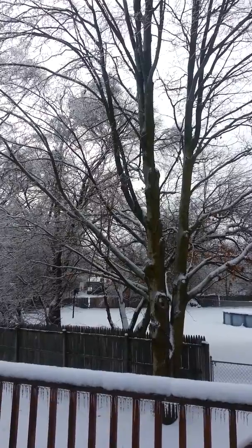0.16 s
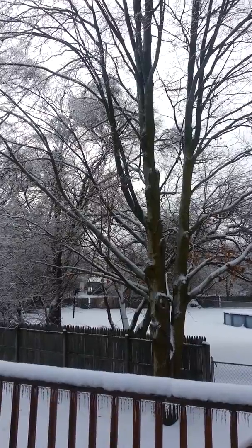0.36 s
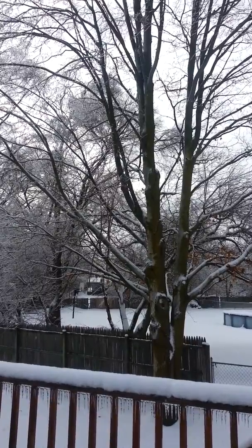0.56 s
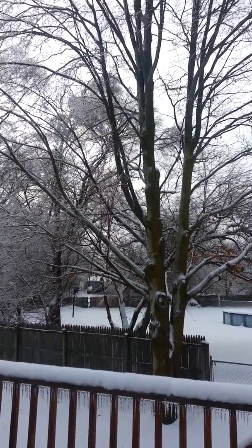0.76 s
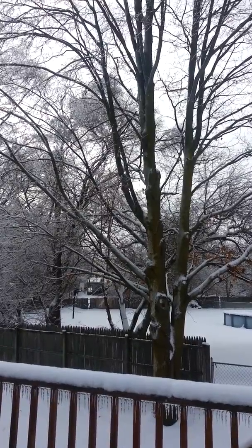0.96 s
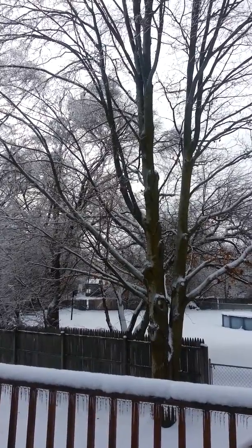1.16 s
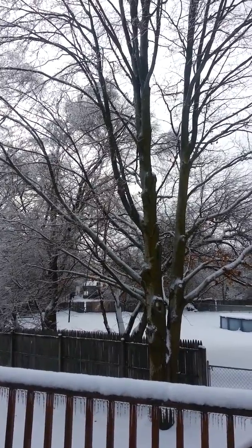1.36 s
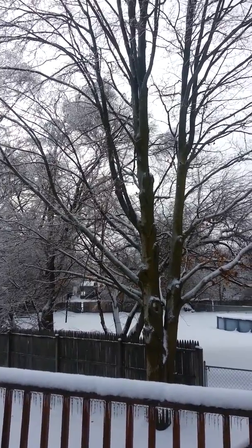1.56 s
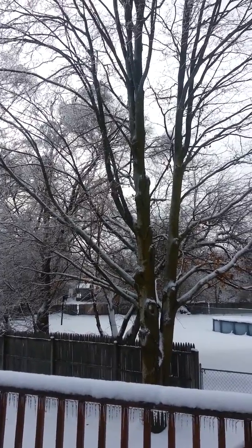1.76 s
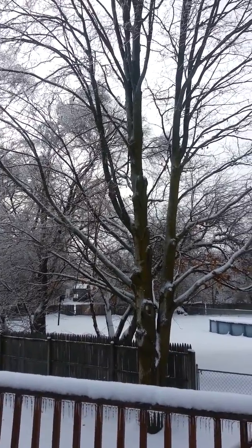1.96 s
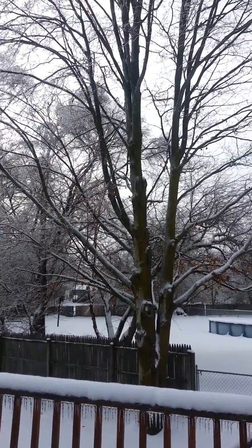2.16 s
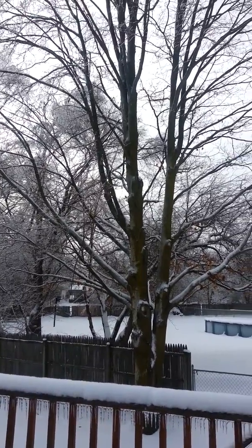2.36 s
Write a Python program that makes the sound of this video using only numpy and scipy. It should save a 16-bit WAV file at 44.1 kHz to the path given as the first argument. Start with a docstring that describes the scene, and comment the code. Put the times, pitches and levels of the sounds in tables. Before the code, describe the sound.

Thawing ice and drops fall from trees in a snowy yard, nearly mono. From 0 to 0.7 s, isolated crisp ticks, tiny pings and fragment sprays sit over thin patter, low hum and distant rush. Ticks then crowd together, with a sharp cluster at 1.2 s. A piece knocks wood at 1.4 s; thicker, uneven crackling continues to 2.5 s, with slushy plops and faint wind puffs near 2.2 and 2.4 s.

```python
"""Ice thaws in the trees of a snowy yard, heard nearly in mono over an electrical hum and a distant rush.
At first single pieces tick on twigs, drops ping, fragments scatter and a thin patter of drops lies behind.
The ticks crowd together from about 0.7 s; near 1.4 s a larger piece knocks on wood and the hum briefly swells.
From there the patter is thicker, with some dips, and two soft puffs of wind rumble near 2.2 and 2.4 s.
Impacts are shaped noise, pulses and random grains; pings, knock, hum and wind are built from sine waves."""
import sys
import numpy as np
from scipy import signal
from scipy.fft import rfft, irfft
from scipy.io import wavfile
from scipy.ndimage import uniform_filter1d

SR = 44100
rng = np.random.default_rng(int(sys.argv[2]) if len(sys.argv) > 2 else 0)


def dump(signal):
    """Clip the signal to [-1, 1] and save it as 16-bit WAV at the path in sys.argv[1]."""
    limited = np.clip(np.atleast_2d(signal).T, -1, 1)
    pcm = np.round(limited * 32767).astype(np.int16)
    wavfile.write(sys.argv[1], SR, pcm)


N = 110250  # length in samples, 2.5 s

# The hum's lowest tone. Each row: time in seconds, rms level in dB.
HUM_SWELL = [(.05, -40.5), (1.41, -40.5), (1.47, -37.5), (1.75, -40.3), (2.45, -40)]
# The hum's weaker upper tones. Each row: pitch in Hz, rms level in dB.
HUM_OVERTONES = [(240, -65), (340, -55), (360, -54), (388, -61), (480, -60), (600, -57)]
HUM_HZ = 120
HUM_WAVER_DB, OVERTONE_WAVER_DB, OVERTONE_SMEAR_RAD = -0.15, 2.5, 0.36

# Colour of the distant rush. Each row: frequency in Hz, relative level in dB.
RUSH_COLOUR = [(25, -14), (55, -12.5), (100, -2), (150, 0.5), (210, 5.5), (290, 5.5), (365, 6), (440, 1.5),
               (650, 1.5), (1000, -2.5), (2000, -11.5), (5000, -20.5), (14000, -85)]
RUSH_DB = -44

# Puffs of wind on the microphone. Each row: middle in seconds, level in dB, half length in seconds.
WIND_PUFFS = [(2.228, -52, 0.028), (2.393, -58, .025)]
PUFF_HZ = 65.7

# How thick the far patter is. Each row: time in seconds, level change in dB.
THAW = [(0, -12), (.12, -6.5), (.32, -10.5), (.49, -10.5), (.66, -6.5), (.79, -7), (.86, -5.5), (1.02, -3),
        (1.08, -4.5), (1.17, -5.5), (1.33, -5.5), (1.47, 5), (1.53, -1), (1.62, -0.5), (1.715, -6),
        (1.74, -0.5), (1.83, 0.5), (1.97, 1), (2.1, 3), (2.25, -1), (2.36, 0), (2.5, -1.5)]
# Colour of the far patter. Each row: frequency in Hz, relative level in dB per Hz.
PATTER_COLOUR = [(250, -35), (500, 2), (850, 4.5), (1500, 6.5), (2600, 4), (4700, 4.5), (7000, 1),
                 (10000, 0), (14500, 6.5)]
PATTER_DB, PATTER_PER_S, PATTER_SPREAD_DB, PATTER_ECHO_DB = -43, 200, 5.5, -3  # dB before the thaw curve
FLURRY_DB, FLURRY_PER_S = 3, 55  # drops of each size come in short flurries
WASH_DB, FLUTTER_DB = -43.5, 2.5  # drops too far off to tell apart, before the thaw curve

# Sprays of fragments further off. Each row: start in seconds, level in dB, decay in seconds,
# lower edge in Hz, upper edge in Hz.
SPRAYS = [(0.057, -35.5, 0.027, 2930, 12200), (.1, -39.5, 0.028, 3800, 6140),
          (.145, -26, 0.0084, 1950, 5640), (.208, -32.5, 0.024, 2000, 11500),
          (0.387, -39.5, .033, 4000, 13400), (0.581, -31.5, 0.01, 2960, 12800),
          (0.681, -31.5, 0.017, 1710, 9000), (0.82, -38, 0.015, 1500, 7060),
          (.93, -40.5, 0.033, 5000, 14000), (1.243, -31, 0.023, 3000, 14100),
          (1.419, -30.5, 0.05, 1180, 11900), (1.651, -32, 0.011, 3200, 4770),
          (1.725, -38, 0.019, 1920, 11900), (1.775, -36, .041, 3000, 14300),
          (2.035, -28, 0.028, 1200, 12800), (2.37, -35, 0.08, 2000, 13100)]
SPRAY_RISE_S, SPRAY_PER_S, SPRAY_SPREAD_DB = 0.013, 3200, 5.5

# Dull plops of slush. Each row: start in seconds, level in dB, lower edge in Hz, upper edge in Hz.
PLOPS = [(.226, 0, 280, 705), (.822, 4.5, 238, 755), (0.851, -1, 696, 2820), (.869, -9, 696, 3000),
         (.965, -2, 400, 1000), (1.245, 4.5, 170, 750), (1.422, 7, 280, 606), (1.559, -1, 900, 2400),
         (1.968, 0, 350, 1990), (2.305, -4, 1100, 2400), (2.429, 1.5, 402, 1900), (2.47, 0.5, 700, 2380)]
PLOP_S = 0.023  # decay

# Tiny drops that ring. Each row: start in seconds, pitch in Hz, peak of the direct ring in dB,
# level of the lingering ring against it in dB.
PINGS = [(0.0383, 8300, -42, -18), (.045, 8300, -33, -16), (.213, 9800, -41, -6), (0.388, 4830, -38.5, -3),
         (.723, 10500, -35, -15), (0.776, 7000, -33, -8), (.917, 12900, -43, -5), (.942, 11540, -37, -14),
         (1.080, 11900, -31.5, -21), (1.208, 5730, -36, -13), (1.265, 5400, -40, -9),
         (1.342, 14350, -32, -5), (1.6895, 14000, -32, -11), (1.716, 8900, -35.5, -8),
         (1.942, 10400, -37, -14), (1.9795, 11300, -35, -12), (2.001, 13950, -36, -9),
         (2.142, 1735, -37, -7), (2.385, 12000, -38, -7)]
PING_S, PING_TAIL_S = 0.0051, 0.025  # decay of the direct and of the lingering ring
# The many fainter pings; their level also follows the thaw curve.
TINK_PER_S, TINK_DB, TINK_SPREAD_DB, TINK_ECHO_DB = 90, -44, 2, -6
TINK_LO_HZ, TINK_HI_HZ = 2626, 13860

# Ringing modes of the knocked wood. Each row: pitch in Hz, level in dB, decay in seconds.
KNOCK_MODES = [(1470, 6.5, 0.0014), (1510, -1.5, 0.0016), (2110, -8, 0.0052)]
KNOCK_S, KNOCK_DB, KNOCK_RISE_S, KNOCK_ECHO_DB = 1.4168, -18.5, 0.0016, -5  # KNOCK_S is its start

# Near ticks of ice and drops. Each row: start in seconds, level in dB, lower edge in Hz,
# upper edge in Hz, level of the scatter after it against the tick in dB.
TICKS = [(0.0375, -7.5, 5000, 8800, -22), (.059, -21, 4000, 11000, -8), (.2125, -14, 6000, 10400, -10),
         (0.4333, -14.5, 4500, 11500, -5), (0.5234, -15.5, 2660, 12000, 5.5),
         (0.714, -15.5, 1990, 12900, 9.5), (0.7274, -10, 5000, 14500, -20), (.775, -14, 6000, 14800, -17),
         (.7808, -7.5, 4800, 8200, -19), (0.8133, -8, 4800, 14500, 1), (.823, -18, 6000, 14800, -1),
         (.861, -7, 2000, 14200, -6), (.8675, -12, 5500, 9000, -8), (.9095, -4, 6400, 13700, -13),
         (.932, -12, 5000, 10000, -8), (1.006, -15.5, 2500, 11000, -4), (1.053, -12, 1870, 14500, 5.5),
         (1.066, -24, 7000, 14500, -8), (1.08, -17, 4500, 14000, -18), (1.1125, -21, 6000, 14000, -12),
         (1.131, -16, 3000, 12000, -2), (1.162, -16, 8000, 14500, 0), (1.18, -10.5, 3000, 10000, 1),
         (1.2043, -1, 2660, 7600, -8), (1.206, -6, 2280, 6000, 2), (1.2108, -6, 2400, 6500, -3),
         (1.2137, -2.5, 1500, 4900, -3), (1.22, -13, 4000, 14100, 3), (1.2477, -1.5, 300, 2740, -2.5),
         (1.2473, -6, 7000, 14600, -5), (1.254, -12.5, 2500, 14600, -10), (1.31, -21, 2500, 9000, 0),
         (1.3435, -24, 5000, 14500, -9), (1.386, -10, 2500, 13600, -23), (1.4168, -9, 3000, 11000, -6),
         (1.4199, 3.5, 1900, 8200, -20), (1.454, -9, 7000, 14400, 3), (1.489, -10.5, 2500, 7000, -10),
         (1.5436, -7, 5500, 13000, -12), (1.5584, 0.5, 2880, 9100, -3.5), (1.581, -7.5, 3500, 13500, -16),
         (1.6407, -6.5, 3060, 7440, -5), (1.6898, -17, 12000, 15000, -18), (1.7164, -6, 8650, 14900, -7),
         (1.728, -8, 1990, 7000, -4), (1.759, -9.5, 2200, 7000, -10), (1.779, -9, 5000, 15100, -5),
         (1.7805, -2, 3380, 5840, 1), (1.7897, -7, 4000, 14000, -6), (1.8001, -6.5, 1980, 8900, -7),
         (1.817, -14.5, 5000, 14000, -2), (1.84, -9.5, 8000, 14500, 3), (1.8436, -3, 3240, 6460, 0.5),
         (1.923, -12, 5000, 12000, -10), (1.938, -6, 4000, 11000, -4), (1.9792, -7.5, 4020, 12000, -3),
         (1.9965, -8, 6000, 14500, -7), (2.002, -14, 7000, 14500, -8), (2.0206, -7, 7500, 14000, -3),
         (2.0508, -7, 1500, 7560, -2), (2.113, -14.5, 4000, 13000, 4), (2.136, -6.5, 3500, 7500, -5),
         (2.165, -9.5, 4500, 15000, 1), (2.2013, -7, 10100, 14500, -9), (2.207, -14, 8000, 14500, -12),
         (2.2151, -4.5, 6200, 14900, -0.5), (2.2757, 1.5, 1890, 5650, -9), (2.2837, -12.5, 7950, 14500, 4),
         (2.2855, -3, 1300, 4000, -3), (2.3325, -10, 6350, 14000, 3), (2.384, -16, 1800, 7950, -15),
         (2.4305, -14, 900, 4500, -16), (2.48, -7.5, 1500, 14000, -3)]
CONTACT_S, CONTACT_HZ = 0.0004174, 7000  # lag of the low tones of a contact, and where it fades
SPLINTER_S, SPLINTER_DB = 0.00065, -8  # the tiny fractures within one contact
CRACK_S, CRACK_DB = 0.0052, -15  # the brittle ring just after contact
SCATTER_S, SCATTER_RISE_S, SCATTER_PER_S, SCATTER_SPREAD_DB = 0.023, 0.0013, 4500, 3.5
NEAR_SIDE_DB = -45  # trace of left-right difference

TOP_HZ = 14650  # where the recorder cuts the treble


def undb(db):
    """Turn decibels into gain."""
    return 10 ** (np.asarray(db) / 20)


def unit(x):
    """Scale a sound to rms 1."""
    return x / np.sqrt(np.mean(x ** 2) + 1e-20)


def unit_energy(x):
    """Scale a short sound so that its squares add up to 1."""
    return unit(x) / np.sqrt(len(x))


def seconds(length):
    """Clock times in seconds for a number of samples."""
    return np.arange(length) / SR


def curve(t, points):
    """Join (seconds, value) points by straight lines."""
    return np.interp(t, *np.array(points).T)


def band(x, lo_hz, hi_hz):
    """Keep the frequencies between two edges."""
    hi = min(hi_hz, SR / 2 - 1000)
    lo = min(lo_hz, hi * .9)
    return signal.sosfilt(signal.butter(2, [lo, hi], "band", fs=SR, output="sos"), x)


def colour(x, points):
    """Weight a sound's spectrum by (Hz, dB) points, then scale to rms 1."""
    hz, db = np.array(points).T
    f = np.maximum(np.fft.rfftfreq(N, 1 / SR), 1)
    gain = undb(np.interp(np.log(f), np.log(hz), db))
    return unit(irfft(rfft(x) * gain, N))


def walk(rate):
    """Smooth random drift with rms 1, from about `rate` random values a second."""
    k = int(SR / rate)
    steps = np.repeat(rng.standard_normal(256), k)[:N]
    return unit(uniform_filter1d(uniform_filter1d(steps, k), k))


def grains(per_s, spread_db, size):
    """Random impacts, many weak and a few strong, at rms 1."""
    chance, strength, sign = rng.random((3, size))
    heft = np.minimum(-np.log(1 - strength), 3.2)
    return unit((chance < per_s / SR) * undb(spread_db * heft) * np.sign(sign - .5))


def burst(envelope):
    """Noise shaped by an envelope, with energy 1."""
    return unit_energy(rng.standard_normal(len(envelope)) * envelope)


def add(out, at_s, x):
    """Mix a sound in at a time."""
    i = int(at_s * SR)
    out[i:i + len(x)] += x[:max(N - i, 0)]


def scatter():
    """Fading splinters and reflections from twigs and fence, with energy 1."""
    t = seconds(SR // 5)
    bits = grains(SCATTER_PER_S, SCATTER_SPREAD_DB, size=len(t))
    return unit_energy(bits * np.exp(-t / SCATTER_S) * (1 - np.exp(-t / SCATTER_RISE_S)))


def tone(hz, db, drift):
    """A sine at an rms level, with a random start and a drifting phase."""
    cycles = hz * seconds(N) + rng.random()
    return np.sqrt(2) * undb(db) * np.sin(2 * np.pi * cycles + drift)


def hum():
    """A mains hum: one low tone that swells gently, and upper tones that waver in level and phase."""
    total = tone(HUM_HZ, curve(seconds(N), HUM_SWELL) + HUM_WAVER_DB * walk(5.9), 0)
    for hz, db in HUM_OVERTONES:
        total += tone(hz, db + OVERTONE_WAVER_DB * walk(14), OVERTONE_SMEAR_RAD * walk(16))
    return total


def distant_rush():
    """Far outdoor sounds blur into steady noise with little treble."""
    return undb(RUSH_DB) * colour(rng.standard_normal(N), RUSH_COLOUR)


def wind():
    """Soft puffs shake the microphone: a low tone with wandering phase swells and fades."""
    t = seconds(N)
    gust = sum(undb(db) * np.exp(-((t - at) / half) ** 2) for at, db, half in WIND_PUFFS)
    return gust * np.sqrt(2) * np.sin(2 * np.pi * PUFF_HZ * t + walk(49.2))


def patter():
    """Countless small impacts of several sizes all over the yard, thickening with the thaw."""
    drops = np.zeros(N)
    # one frequency band for each size of drop, then one broad mixture
    for lo_hz, hi_hz in [(600, 3000), (1500, 4500), (3000, 7000), (5500, 11000), (9500, 15500), (1000, 15000)]:
        hits = band(grains(PATTER_PER_S, PATTER_SPREAD_DB, size=N), lo_hz, hi_hz)
        echo = signal.fftconvolve(hits, scatter())[:N]
        drops += (hits + undb(PATTER_ECHO_DB) * echo) * undb(FLURRY_DB * walk(FLURRY_PER_S))
    wash = band(rng.standard_normal(N), 630, 12400) * undb(FLUTTER_DB * walk(29.7))
    both = undb(PATTER_DB) * colour(drops, PATTER_COLOUR) + undb(WASH_DB) * colour(wash, PATTER_COLOUR)
    return undb(curve(seconds(N), THAW)) * both


def sprays():
    """Loosened ice falls through the twigs in short showers of grains."""
    out, t = np.zeros(N), seconds(SR // 2)
    for at, db, decay, lo_hz, hi_hz in SPRAYS:
        bits = unit(band(grains(SPRAY_PER_S, SPRAY_SPREAD_DB, size=len(t)), lo_hz, hi_hz))
        add(out, at, undb(db) * bits * np.exp(-t / decay) * (1 - np.exp(-t / SPRAY_RISE_S)))
    return out


def plops():
    """Wet lumps land softly and break up: fading noise in a limited band."""
    out, t = np.zeros(N), seconds(SR // 10)
    for at, db, lo_hz, hi_hz in PLOPS:
        add(out, at, undb(db) * band(burst(np.exp(-t / PLOP_S)), lo_hz, hi_hz))
    return out


def faint_pings():
    """Draw many weak pings at random times and pitches, louder as the thaw thickens."""
    rows = []
    for when, pitch, weakness in rng.random(size=(int(TINK_PER_S * N / SR), 3)):
        at = when * N / SR
        hz = TINK_LO_HZ * (TINK_HI_HZ / TINK_LO_HZ) ** pitch
        extra_db = -TINK_SPREAD_DB * np.log(max(weakness, 1 / 4))
        rows.append((at, hz, TINK_DB + curve(at, THAW) + extra_db, TINK_ECHO_DB))
    return rows


def pings():
    """Drops ring as short sines, followed by a rough ring that echoes off the twigs."""
    out, t = np.zeros(N), seconds(SR // 10)
    for at, hz, db, echo_db in PINGS + faint_pings():
        roughness = unit(uniform_filter1d(rng.standard_normal(len(t)), size=110))
        echo = roughness * np.exp(-t / PING_TAIL_S)
        add(out, at, undb(db) * np.sin(2 * np.pi * hz * t) * (np.exp(-t / PING_S) + undb(echo_db) * echo))
    return out


def wood_knock():
    """A larger piece hits a branch: a few fading wood tones and their scattered echo."""
    out, t = np.zeros(N), seconds(SR // 10)
    wood = sum(undb(db) * np.sin(2 * np.pi * hz * t) * np.exp(-t / decay) for hz, db, decay in KNOCK_MODES)
    wood = wood * (1 - np.exp(-t / KNOCK_RISE_S))
    echo = signal.fftconvolve(wood, scatter())[:len(t)]
    add(out, KNOCK_S, undb(KNOCK_DB) * (wood + undb(KNOCK_ECHO_DB) * echo))
    return out


def contact(t):
    """A hard contact: a pulse whose treble comes a moment before its lower tones."""
    f = np.fft.rfftfreq(len(t), 1 / SR)
    lag = CONTACT_S * (1 + np.exp(-f / CONTACT_HZ))
    # adding up the delays over frequency gives the phase
    phase = -2 * np.pi * np.cumsum(lag) * f[1]
    pulse = irfft(np.exp(1j * phase), len(t))
    return np.roll(pulse, -int(CONTACT_S * SR / 2))  # start a little sooner


def ticks():
    """Each near impact is a hard contact with tiny fractures, a brittle ring and a scatter."""
    out, t = np.zeros(N), seconds(SR // 5)
    for at, db, lo_hz, hi_hz, scatter_db in TICKS:
        splinters = burst(t * np.exp(-t / SPLINTER_S))
        snap = unit_energy(contact(t) + undb(SPLINTER_DB) * splinters)
        crack = burst(np.exp(-t / CRACK_S) * (1 - np.exp(-t / CRACK_S)))
        blow = snap + undb(CRACK_DB) * crack + undb(scatter_db) * scatter()
        add(out, at, undb(db) * band(blow, lo_hz, hi_hz))
    return out


def scene():
    """Everything sits in the middle; a faint second draw of ticks, opposite left and right, adds width."""
    background = hum() + distant_rush() + wind() + patter()
    middle = background + sprays() + plops() + pings() + wood_knock() + ticks()
    return middle + undb(NEAR_SIDE_DB) * ticks() * np.array([[1], [-1]])


def record(dry):
    """The recorder cuts the top steeply."""
    return signal.sosfilt(signal.ellip(10, .2, 75, TOP_HZ, fs=SR, output="sos"), dry)


dry = scene()
out = record(dry)
dump(out)
```